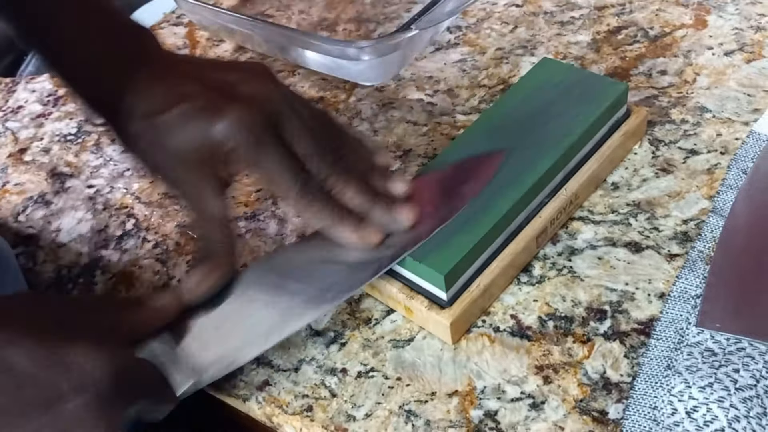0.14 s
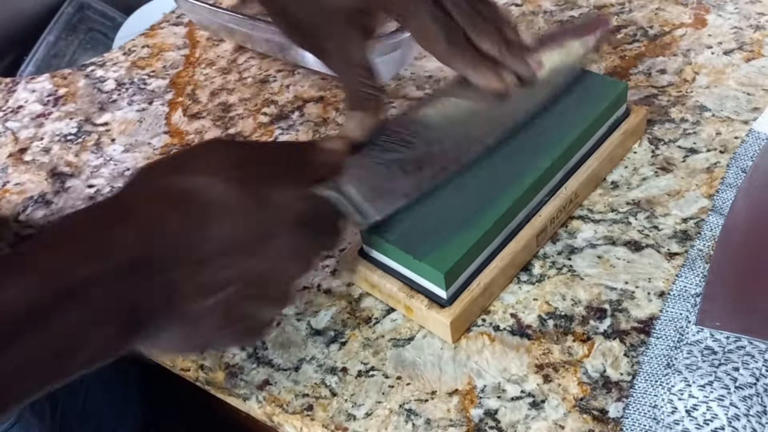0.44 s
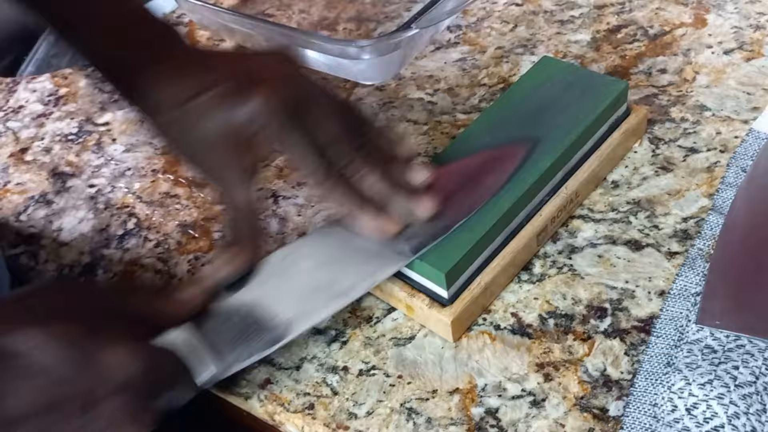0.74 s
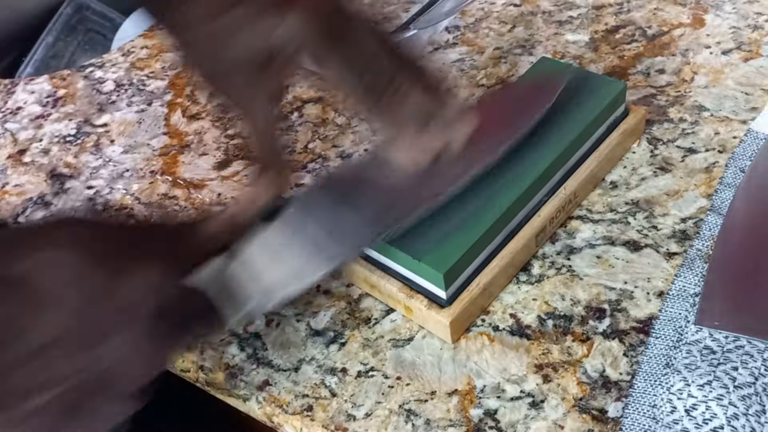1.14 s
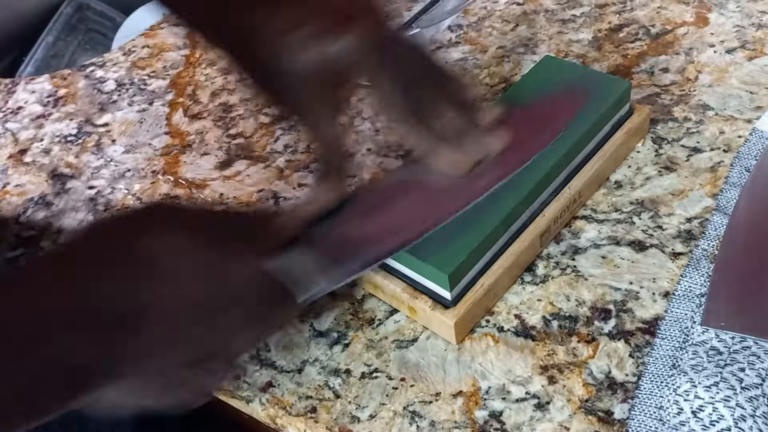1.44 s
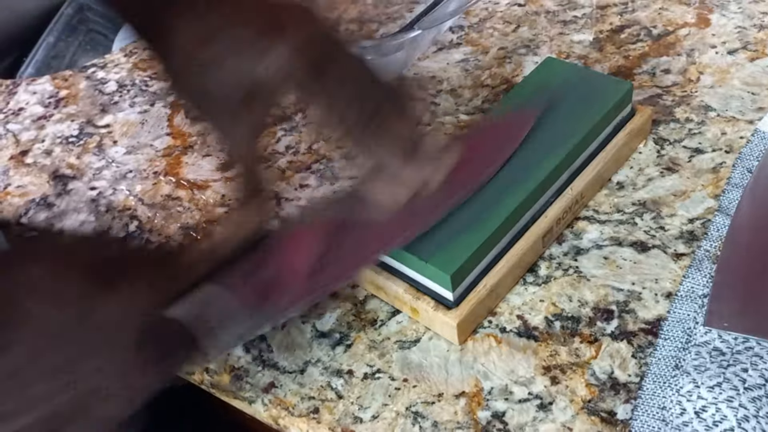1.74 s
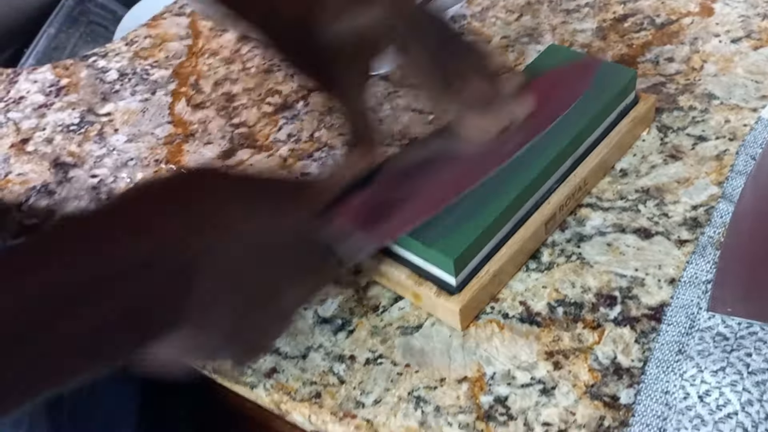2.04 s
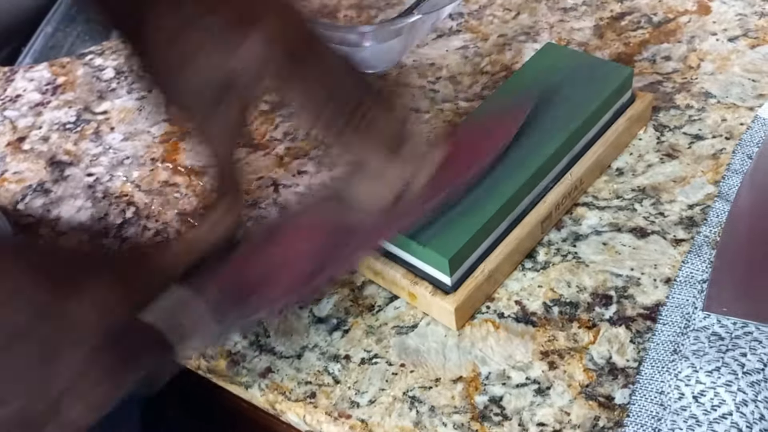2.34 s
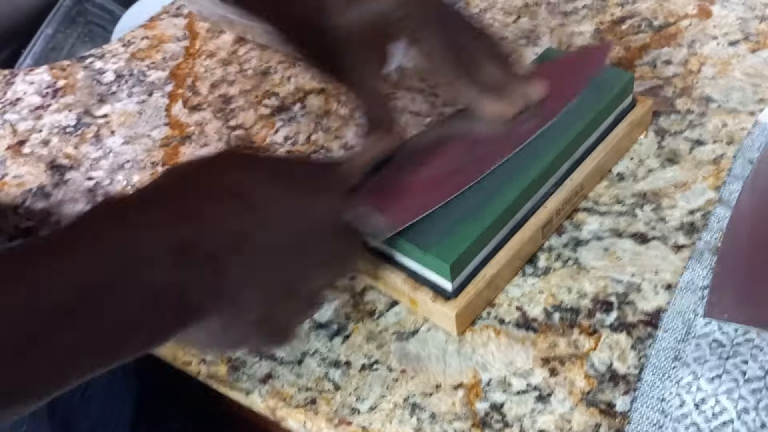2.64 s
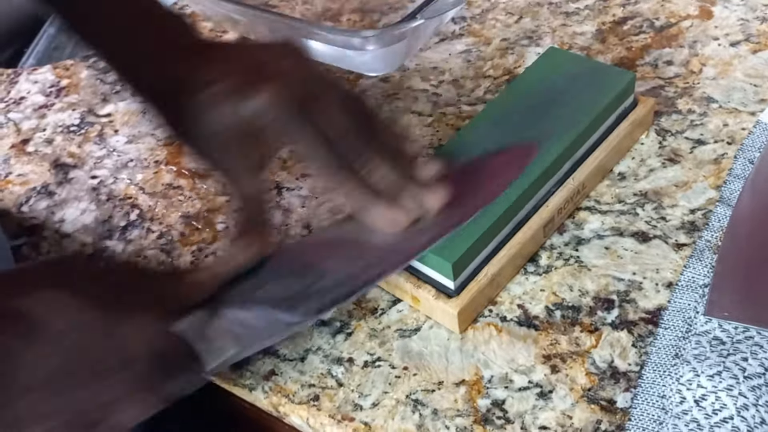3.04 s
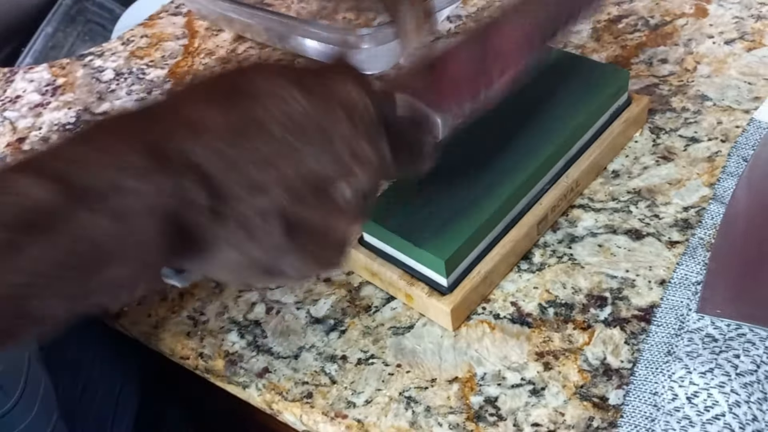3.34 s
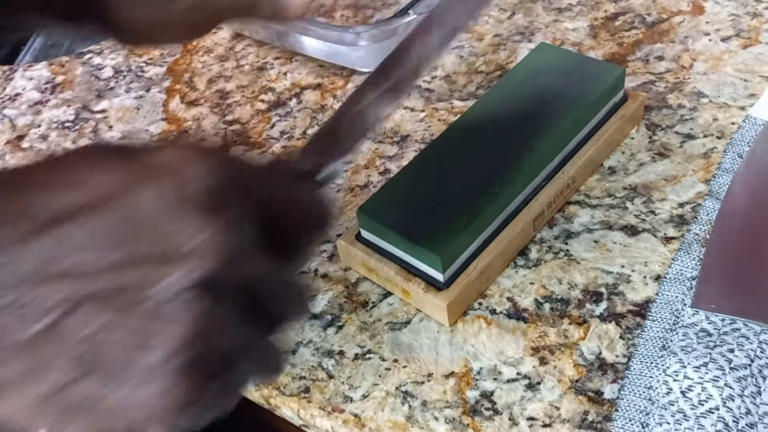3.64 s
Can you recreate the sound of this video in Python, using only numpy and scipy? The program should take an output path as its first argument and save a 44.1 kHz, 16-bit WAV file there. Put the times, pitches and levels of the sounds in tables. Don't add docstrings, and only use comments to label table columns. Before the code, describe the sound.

A kitchen knife strokes a whetstone six times, close to a phone microphone. Each stroke starts with a sharp metallic clack, then a gritty hiss swells and cuts off at the lift, over faint appliance hum.

```python
import sys
import numpy as np
from scipy import signal
from scipy.fft import rfft, irfft, next_fast_len
from scipy.io import wavfile
from scipy.ndimage import uniform_filter1d, map_coordinates

SR = 44100
rng = np.random.default_rng(int(sys.argv[2]) if len(sys.argv) > 2 else 0)


def decibels_to_gain(level_db):
    exponent = np.asarray(level_db, float) / 20
    return 10 ** exponent


def output_pcm(signal):
    pcm = np.clip(np.atleast_2d(signal).T, -1, 1) * 32767
    wavfile.write(sys.argv[1], SR, np.round(pcm).astype(np.int16))


N = 167580

# t/s, peak/dB, crack over ring/dB, brightness/(dB/octave), skid re peak/dB
LANDINGS = [
    (0.1027, -17.5, 3, -3, -9),
    (0.6846, -15, 3.5, -0.45, -17),
    (1.255, -17.5, 1, -1, -11.5),
    (1.791, -23, -3.5, -2.1, -19.5),
    (2.397, -19, -2.5, -1.5, -11.5),
    (2.977, -18.5, -4, -2, -16),
]
# f/Hz, level/dB, t60/s
HELD_1 = [(126.4, -47.5, 0.079), (743, -22.5, .15), (797, -18, 0.27), (1063, -18, 0.18), (1410, -2, 0.03),
          (1566, -10, 0.079), (2017, -3.5, 0.083), (3880, 0.5, 0.035), (4460, 3.5, 0.017), (4990, 8, 0.024),
          (6750, 1.5, 0.07)]
# f/Hz, level/dB, t60/s
HELD_3 = [(130, -37, 0.083), (543, -26.5, .1), (848, -18, 0.19), (1370, -14.5, 0.15), (1629, -2, 0.049),
          (2070, -2.5, .07), (4530, -7.5, 0.093), (6400, -11, 0.059)]
# f/Hz, level/dB, t60/s
HELD_STEEP = [(409, -26, 0.27), (791, -26.5, 0.19), (1291, -11.5, 0.11), (1798, -5.5, 0.12),
              (2286, -5, 0.036), (3090, -2.5, 0.09), (3790, -7.5, 0.14), (4420, -19, 0.11),
              (4610, -2.5, 0.046), (5087, -17.5, 0.19), (6080, 1.5, 0.035), (7050, -5, 0.053)]


def unit(x):
    return x / np.sqrt(np.mean(x ** 2) + 1e-20)


def along(points, hz):
    f, v = np.transpose(points)
    return np.interp(np.log(hz + 1), np.log(f + 1), v)


def wobble(knots_per_s):
    knots = rng.standard_normal(int(N * knots_per_s / SR) + 4)
    return map_coordinates(knots, [np.arange(N) * knots_per_s / SR])


def filtered(x, response):
    m = next_fast_len(N + SR // 2)
    return irfft(rfft(x, m) * response(np.fft.rfftfreq(m, 1 / SR)), m)[..., :N]


def resonant(peaks):
    def response(f):
        total = 0
        for k, (centre_hz, width_hz, db) in enumerate(peaks):
            damping = 1j * f * width_hz
            total = total + (-1) ** k * decibels_to_gain(db) * damping / (centre_hz ** 2 - f * f + damping)
        return total
    return response


def smooth_field(shape, bins, frames):
    field = uniform_filter1d(rng.standard_normal(shape), size=bins, axis=0)
    return unit(uniform_filter1d(field, size=frames, axis=1))


def grit():
    grains_per_s, grain_db, grain_share = 2700, 2.5, 0.58
    hit = rng.random((2, N)) < grains_per_s / SR
    size = np.minimum(rng.exponential(size=(2, N)), 3.5)
    grains = hit * rng.choice([-1, 1], (2, N)) * decibels_to_gain(grain_db * size)
    bed = rng.standard_normal((2, N))
    return np.sqrt(grain_share) * unit(grains) + np.sqrt(1 - grain_share) * bed


def patchy(pair, patchy_db, progress, contact_hz=None):
    # start f/Hz, end f/Hz, width/octaves, level/dB
    slides_by_stroke = [
        [(7500, 7400, 0.069, 8.5), (2300, 750, .08, 7.5), (12500, 21000, .1, -3.5)],
        [(7000, 7200, 0.094, 6.5), (2280, 1950, 0.11, 8.5), (3560, 3500, 0.22, -3)],
        [(7700, 7400, .07, 4), (4600, 5800, 0.05, 10), (3460, 1800, 0.038, 14.5)],
        [(7400, 4900, .05, 7), (4400, 4750, .06, 3.5), (3700, 3200, .1, 4.5)],
        [(7650, 6900, .06, 2.5), (5300, 3300, .05, 4), (3400, 3050, 0.027, 2.5)],
        [(7800, 7500, .06, 4.5), (4500, 4550, .05, 5.5), (3250, 2950, 0.042, 5.5), (2050, 2200, .1, 7)],
    ]
    contact_width_oct, contact_db, below_db_per_oct = 0.15, -2, 8.5
    hz, t, z = signal.stft(pair, SR, nperseg=512)
    bin_hz = hz[:, None] + 1
    db = patchy_db * smooth_field(z.shape[1:], 2, 4)
    db = db + 2 * np.minimum(db + patchy_db, 0)
    frame = np.minimum((t * SR).astype(int), N - 1)
    for k, slides in enumerate(slides_by_stroke):
        u = progress[frame] - k
        active = (u >= 0) & (u < 1)
        for start_hz, end_hz, width_oct, top_db in slides:
            slide_hz = start_hz + (end_hz - start_hz) * np.clip(u, 0, 1)
            db = db + active * top_db * np.exp(-(np.log2(bin_hz / slide_hz) / width_oct) ** 2)
    if contact_hz is not None:
        octaves = np.log2(bin_hz / contact_hz[frame])
        db = db + contact_db * np.exp(-(octaves / contact_width_oct) ** 2)
        db = db + below_db_per_oct * np.clip(octaves, -2, 0)
    return unit(signal.istft(z * decibels_to_gain(db), SR, nperseg=512)[1][:, :N])


def stroke_motion():
    # t/s, hiss/dB, blade body over hiss/dB
    early = [
        [(.115, -30.5, -5.5), (.17, -41, -4), (.25, -30.5, -16.5), (.34, -24, -14.5), (.39, -28.5, -12),
         (.435, -32.5, -4.5), (.46, -47.5, -13.5)],
        [(.70, -36.5, -10.5), (.74, -42, -6.5), (.82, -40, -10), (.89, -30, -14), (.96, -25, -13),
         (1.01, -28, -7), (1.07, -53.5, -6)],
        [(1.27, -31.5, -6), (1.32, -40, -18.5), (1.4, -30, -13.5), (1.48, -29.5, -14), (1.53, -22, -12.5),
         (1.57, -32, -22), (1.61, -38, -7.5), (1.65, -65.5, -13.5)],
    ]
    # t/s, hiss/dB, blade body over hiss/dB
    late = [
        [(1.8, -33, -9), (1.884, -43, -3), (1.887, -35, -5), (1.93, -29.5, -4), (1.99, -23, -12.5),
         (2.06, -28.5, -7.5), (2.11, -25, -14), (2.18, -40, -7.5), (2.21, -59, -9)],
        [(2.41, -34.5, -4.5), (2.471, -51, -9), (2.478, -38, -1.5), (2.5, -32, -0.5), (2.535, -23, -9.5),
         (2.57, -27, -13.5), (2.65, -24.5, -6.5), (2.69, -24.5, -17), (2.75, -56, 5)],
        [(2.99, -35, -17.5), (3.025, -45.5, -8.5), (3.058, -34.5, -1.5), (3.072, -28.5, -7), (3.11, -26, -8),
         (3.2, -25, -10), (3.24, -21, -21), (3.27, -28, -8.5), (3.32, -50, -12.5)],
    ]
    # start f/Hz, end f/Hz
    contact_range_hz = [
        (3600, 570),
        (5200, 2140),
    ]
    release_db_per_s = 365
    t = np.arange(N) / SR
    hiss_db = -65 - 292 * t
    body_db, contact_hz = np.full(N, -12.), np.full(N, 3000.)
    grip, progress = np.zeros((4, N)), np.zeros(N)
    for k, (rows, (down_s, *_)) in enumerate(zip([*early, *late], LANDINGS)):
        s, hiss, body = np.transpose(rows)
        on = t >= down_s
        fraction = (t[on] - down_s) / (s[-1] - down_s)
        hiss_db[on] = np.interp(t[on], s, hiss) - release_db_per_s * np.maximum(t[on] - s[-1], 0)
        body_db[on] = np.interp(t[on], s, body)
        start_hz, end_hz = contact_range_hz[k >= len(early)]
        contact_hz[on] = start_hz * (end_hz / start_hz) ** np.clip(fraction, 0, 1)
        progress[on] = k + np.clip(fraction, 0, 1 - 1 / SR)
        grip[:, on] = 0
        grip[(0, 1, 2, 3, 3, 3)[k], on] = 1
    return hiss_db, body_db, contact_hz, grip, progress


def edge_hiss(drive_db, progress):
    # f/Hz, density/(dB/Hz)
    scrape = [(1700, -48.5), (3000, -16.5), (5500, -15.5), (8900, -15), (11500, -8), (14500, -10),
              (15900, -10)]
    # f/Hz, width/Hz, level over grit/dB
    steel = [(7550, 650, -1), (12900, 1800, -5.5), (13930, 320, -3)]
    edge = lambda hz: decibels_to_gain(along(scrape, hz)) * (1 + abs(resonant(steel)(hz)))
    return decibels_to_gain(drive_db) * patchy(filtered(grit(), edge), 4.5, progress)


def blade_body(drive_db, contact_hz, grip, progress):
    # f/Hz, density/(dB/Hz)
    body_spectrum = [(500, -15), (900, -12.5), (2000, 0.5), (4600, 0), (6000, -3), (8000, -18.5)]
    # f/Hz, level/dB, t60/s
    held_2 = [(150, -36.5, 0.17), (737, -14.5, 0.19), (802, -22, 0.09), (1040, -19, 0.14),
              (1400, -5.5, 0.067), (1580, -16.5, 0.073), (2050, -8.5, 0.089), (3696, 2.5, 0.039),
              (4230, -1, 0.06), (4610, 9.5, 0.013), (6444, -13, 0.09)]
    rub = decibels_to_gain(drive_db)
    body = filtered(grit(), lambda hz: decibels_to_gain(along(body_spectrum, hz)))
    body = rub * patchy(body, 5, progress, contact_hz)
    shake = rub * grit()
    for held, modes in zip(grip, (HELD_1, held_2, HELD_3, HELD_STEEP)):
        peaks = [(hz, 5 / t60_s, db) for hz, db, t60_s in modes]
        body = body + decibels_to_gain(-10) * filtered(held * shake, resonant(peaks))
    return body


def free_ring(hiss_db):
    # f/Hz, width/Hz, level/dB
    free_modes = [(3800, 18, -5), (7300, 13, 3), (12020, 14, 4), (14290, 15, 4)]
    return decibels_to_gain(-3) * filtered(decibels_to_gain(hiss_db) * grit(), resonant(free_modes))


def wooden_base(hiss_db):
    # f/Hz, width/Hz, level/dB
    wood_modes = [(94.8, 11, -9.5), (149.3, 21, -8), (208.4, 30, -2.5), (274.3, 10.9, 3), (335, 67, -12),
                  (427.7, 12.6, -1), (517, 58, -16)]
    base_db, follow, hang_s = -53.5, .14, .22
    push = decibels_to_gain(follow * np.maximum(hiss_db + 34.5, -60))
    push = uniform_filter1d(push, int(hang_s * SR)) * decibels_to_gain(0.9 * wobble(6.2))
    return decibels_to_gain(base_db) * push * unit(filtered(rng.standard_normal((2, N)), resonant(wood_modes)))


def strokes():
    hiss_db, body_db, contact_hz, grip, progress = stroke_motion()
    rough_db = 1.1 * wobble(70) + .7 * wobble(250)
    hiss = edge_hiss(hiss_db + rough_db, progress)
    body = blade_body(hiss_db + body_db + rough_db, contact_hz, grip, progress)
    return hiss + body + free_ring(hiss_db) + wooden_base(hiss_db)


def landings():
    crack_t60_s, snap_t60_s, rise_s, lead_s = 0.037, 0.0051, 0.00055, .0035
    out, t = np.zeros((2, N + SR)), np.arange(SR // 4) / SR
    crack_band = signal.butter(1, [1100 / SR * 2, 6500 / SR * 2], "band")
    lead = np.arange(-200, 0)
    grips = [HELD_1, HELD_1, HELD_3] + [HELD_STEEP] * 3
    for (s, db, crack_db, bright_db, lead_db), modes in zip(LANDINGS, grips):
        draw = rng.standard_normal((2, len(modes), 2))
        hz, level, t60_s = np.transpose(modes)[..., None]
        shiver = .045 * np.cumsum(rng.standard_normal((len(modes), len(t))), axis=1)
        ring_db = level + bright_db * np.log2(hz / 2000) + 0.91 * draw[..., :1] - 60 * t / t60_s
        ring = decibels_to_gain(ring_db) * np.sin(2 * np.pi * hz * t + 1.3 * draw[..., 1:] + shiver)
        decay = decibels_to_gain(-60 * t / crack_t60_s) + 3.5 * decibels_to_gain(-60 * t / snap_t60_s)
        crack = decibels_to_gain(crack_db) * decay * signal.lfilter(*crack_band, rng.standard_normal((2, len(t))))
        at = round(s * SR)
        out[:, at:at + len(t)] += decibels_to_gain(db - 5.5) * (1 - np.exp(-t / rise_s)) * (ring.sum(1) + crack)
        skid = np.exp(lead / SR / lead_s * 3) * np.diff(rng.standard_normal((2, 201)))
        out[:, at + lead] += decibels_to_gain(db + lead_db) * skid
    return out[:, :N]


def squeaks():
    # t/s, f/Hz, level/dB, length/s
    catches = [(.435, 2020, -36, .006), (1.62, 14300, -38, .02), (1.925, 4350, -31, .01),
               (1.955, 3800, -33, .01), (2.492, 4250, -32, .008), (2.503, 3600, -32, .008),
               (2.669, 5200, -20, .011), (3.235, 12000, -30, .015), (3.34, 1545, -54, .05),
               (.435, 900, -46, .025), (2.125, 4750, -31, .014), (1.03, 720, -54, .03),
               (2.18, 1250, -49, .012), (2.185, 1750, -48, .012)]
    sag = -0.0087
    out, t = np.zeros((2, N)), np.arange(N) / SR
    rough = np.array([wobble(300), wobble(250)])
    for s, hz, db, length_s in catches:
        near = abs(t - s) < 3 * length_s
        u = (t[near] - s) / length_s
        phase = 2 * np.pi * hz * length_s * (u + sag * u * u / 2)
        phase = phase + 1.1 * rough[:, near] * min(1, .025 / length_s)
        out[:, near] += decibels_to_gain(db) * np.exp(-u * u * 2) * np.sin(phase)
    return out


def ports(pair, alike, offset=1):
    # f/Hz, left over right/dB
    tilt = [(380, 1), (700, 1.5), (1500, -3.5), (5980, 0), (15000, -1)]
    lag_s = -0.000037

    def spread(hz):
        angle = np.arccos(np.clip(along(alike, hz), 0, 1)) / 2
        return np.array([np.cos(angle), np.sin(angle)])

    def imbalance(hz):
        half = decibels_to_gain(offset * along(tilt, hz) / 2) * np.exp(-1j * np.pi * offset * lag_s * hz)
        return np.array([half, 1 / half])

    a, b = filtered(pair, spread)
    return filtered(np.array([a + b, a - b]), imbalance)


def room(x):
    # f/Hz, t60/s
    decay_s = [(300, 0.9), (2000, 0.33), (8000, 0.31), (15000, 0.2)]
    hz, t, z = signal.stft(rng.standard_normal((2, SR // 2)), SR, nperseg=256)
    fade = decibels_to_gain(-60 * t / along(decay_s, hz)[:, None]) * (hz[:, None] > 500)
    tail = signal.istft(z * fade, SR, nperseg=256)[1]
    delayed = np.pad(x, (200, 0))[None]
    return signal.fftconvolve(delayed, tail / np.linalg.norm(tail[0]), axes=1)[:, :N]


def kitchen():
    # f/Hz, density/(dB/Hz)
    hum_spectrum = [(15, -58.5), (25, -26.5), (204, -2.5), (361, -6), (452, -13), (900, -41), (1170, -63),
                    (1980, -120)]
    # f/Hz, density/(dB/Hz)
    air_spectrum = [(530, -35), (900, -14), (3500, -14), (5500, -16), (15800, -21)]
    # f/Hz, width/Hz, level/dB
    whine_modes = [(1780, 160, -9), (3810, 85, 2), (4230, 160, -3)]
    # f/Hz, left-right likeness/1
    quiet_alike = [(60, .75), (150, .93), (400, .85), (950, .39), (3770, .03)]
    noise = lambda response: unit(filtered(rng.standard_normal((2, N)), response))
    hum = decibels_to_gain(-65.5 + 1.5 * wobble(6)) * noise(lambda hz: decibels_to_gain(along(hum_spectrum, hz)))
    air = decibels_to_gain(-77) * noise(lambda hz: decibels_to_gain(along(air_spectrum, hz)))
    whine = decibels_to_gain(-76) * noise(resonant(whine_modes))
    return ports(hum + air + whine, quiet_alike, offset=0)


def scene():
    # f/Hz, left-right likeness/1
    knife_alike = [(60, 0.62), (130, 0.96), (400, 0.92), (800, 0.47), (1500, 0.2), (4000, 0.12),
                   (15000, 0.051)]
    knife, catches = strokes() + landings(), squeaks()
    echo = decibels_to_gain(-9.5) * room(knife[0] + .5 * catches[0])
    return ports(knife + catches, knife_alike) + echo + kitchen()


def dropped(x):
    # start t/s, end t/s, f/Hz, width/Hz
    dropouts = [(.16, .22, 3750, 120), (.27, .36, 3850, 140), (.79, .81, 8600, 500), (.80, .895, 3350, 120),
                (.895, .94, 3420, 450), (.82, .87, 4650, 120), (.86, .89, 6350, 140),
                (1.36, 1.41, 5150, 200), (1.385, 1.405, 5850, 300), (2.56, 2.61, 3500, 100),
                (2.52, 2.545, 5750, 150), (3.285, 3.31, 3450, 100), (1.37, 1.39, 3900, 400),
                (1.81, 1.85, 4150, 150), (1.81, 1.85, 3450, 150), (1.94, 1.96, 7350, 300),
                (2.42, 2.435, 3450, 200), (3.14, 3.17, 3700, 250)]
    stray_depth, stray_low_hz, stray_high_hz = 2.2, 2300, 10500
    leak_hz, margin_s = 110, .008
    hz, t, z = signal.stft(x, SR, nperseg=1024)
    chance = smooth_field(z.shape[1:], 4, 4)
    power = (abs(z) ** 2).sum(axis=(0, 1))
    loud = power > np.median(power) / 10
    in_band = ((hz > stray_low_hz) & (hz < stray_high_hz))[:, None]
    keep = ~((chance < -stray_depth) & loud & in_band)
    for start_s, end_s, centre_hz, width_hz in dropouts:
        muted = abs(hz - centre_hz) < (width_hz + leak_hz) / 2
        keep[muted] &= (t < start_s - margin_s) | (t > end_s + margin_s)
    once = signal.istft(z * keep, SR, nperseg=1024)[1][:, :N]
    again = signal.stft(once, SR, nperseg=1024)[2]
    return signal.istft(again * keep, SR, nperseg=1024)[1][:, :N]


def band_limit(x):
    return signal.sosfilt(signal.butter(12, 16970, fs=SR, output="sos"), x)


def record(dry):
    limited = filtered(dropped(dry), lambda hz: 1 / (1 + (hz / 15900) ** 900))
    return band_limit(limited)


dry = scene()
out = record(dry)
output_pcm(out)
```